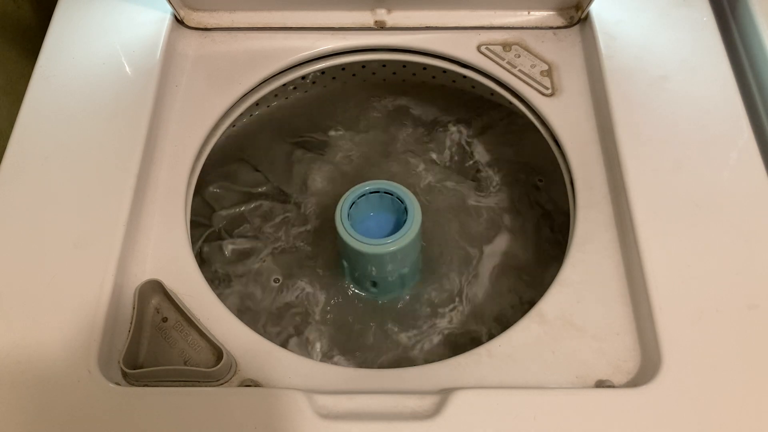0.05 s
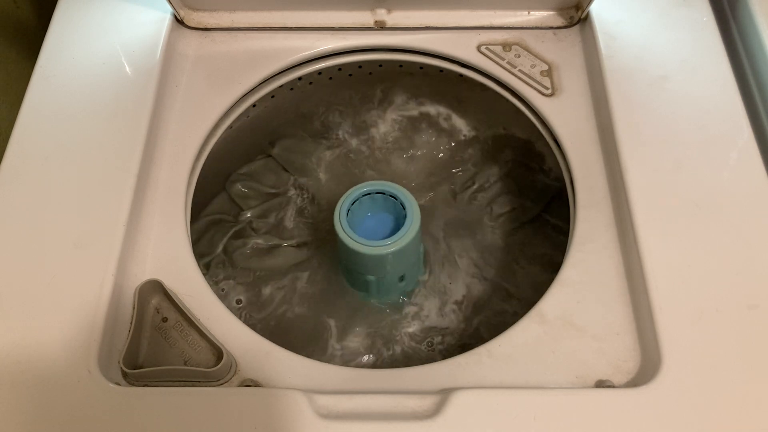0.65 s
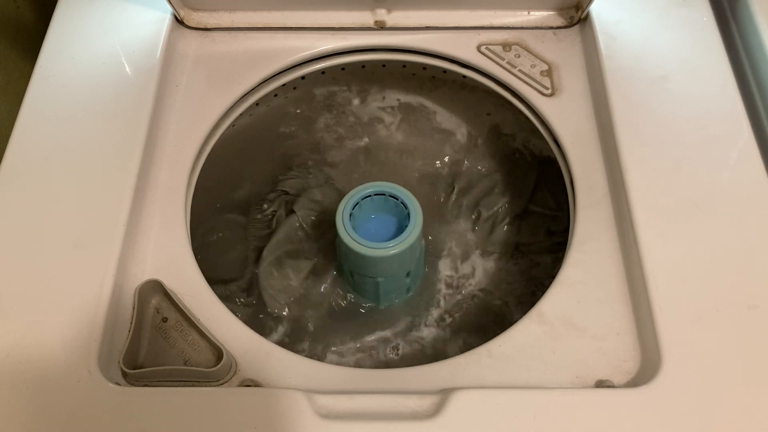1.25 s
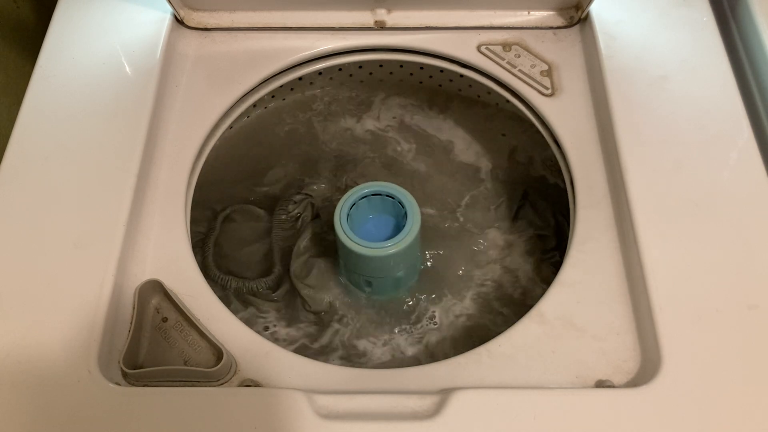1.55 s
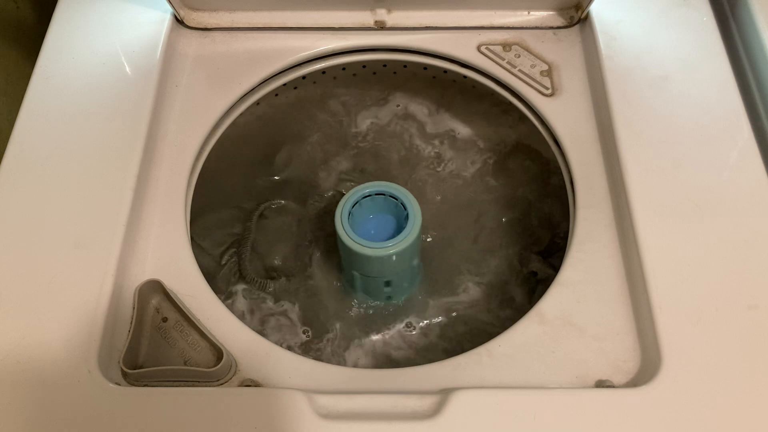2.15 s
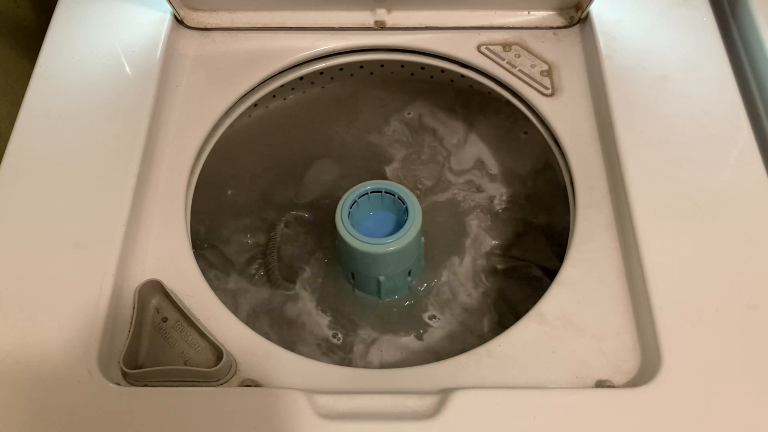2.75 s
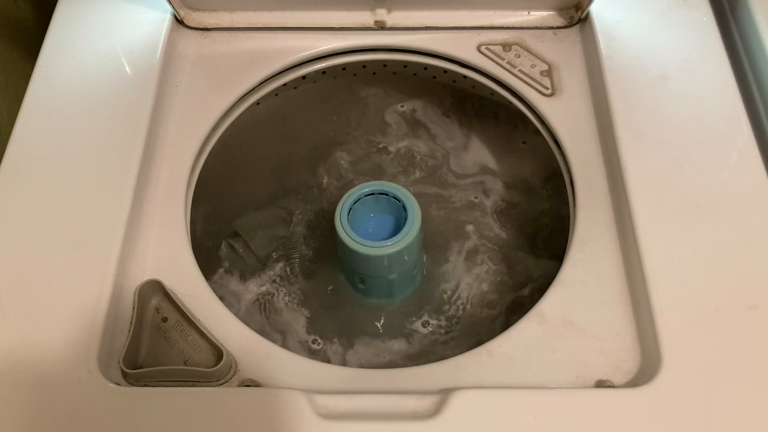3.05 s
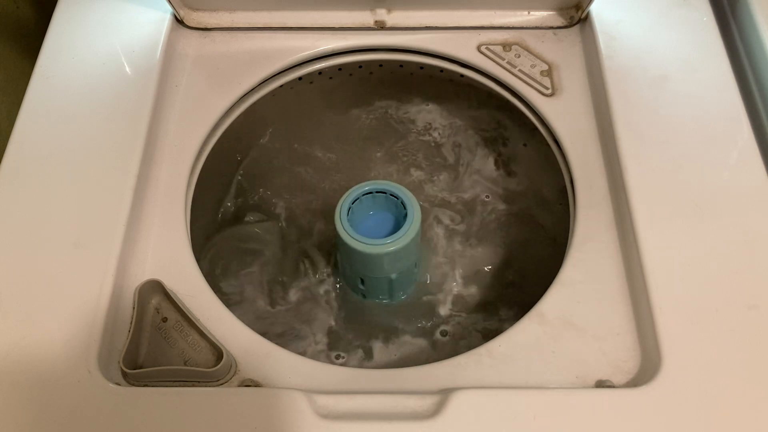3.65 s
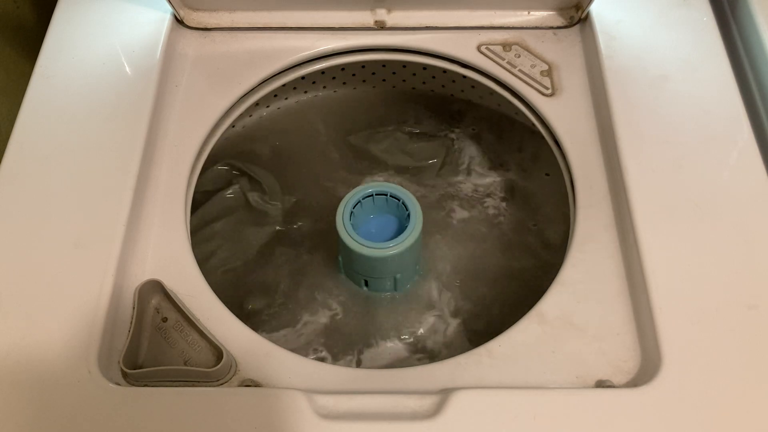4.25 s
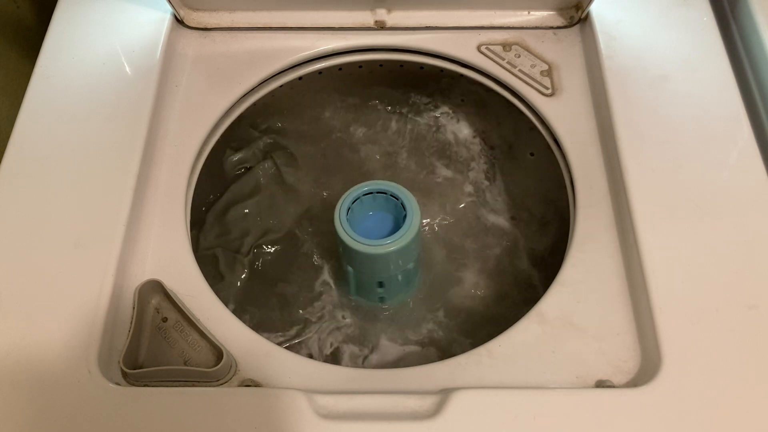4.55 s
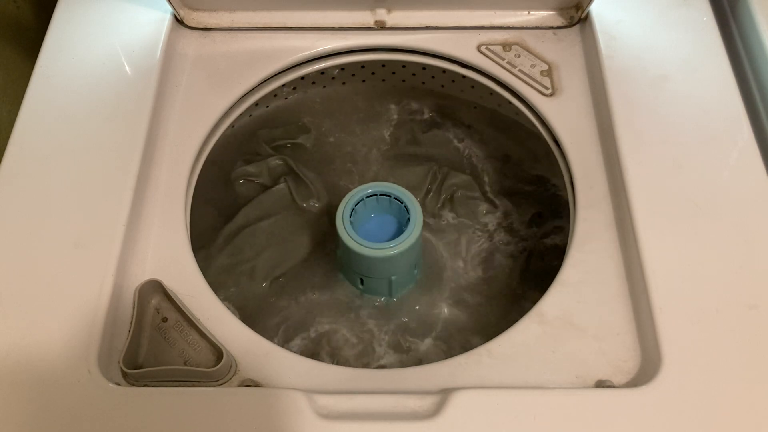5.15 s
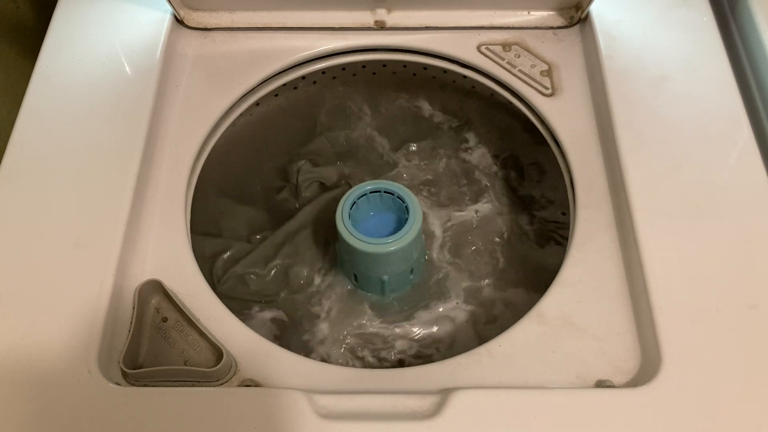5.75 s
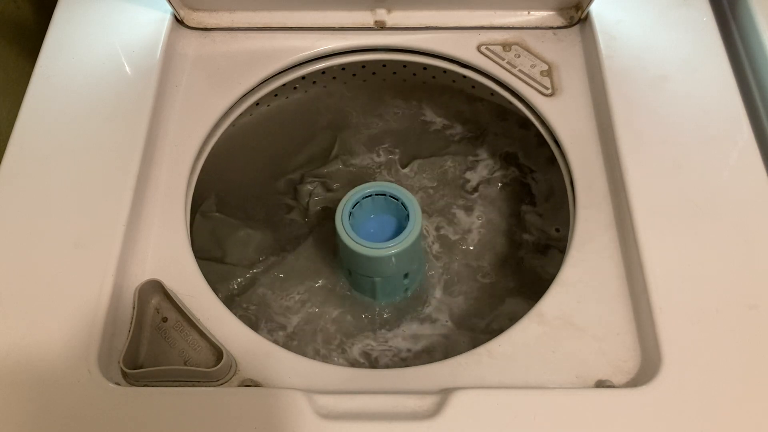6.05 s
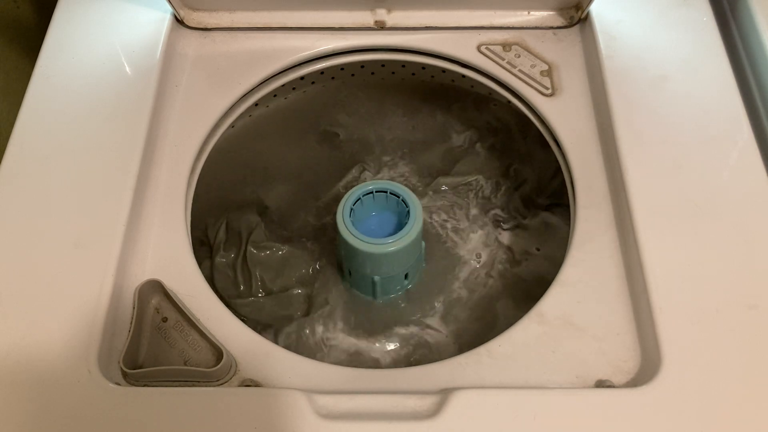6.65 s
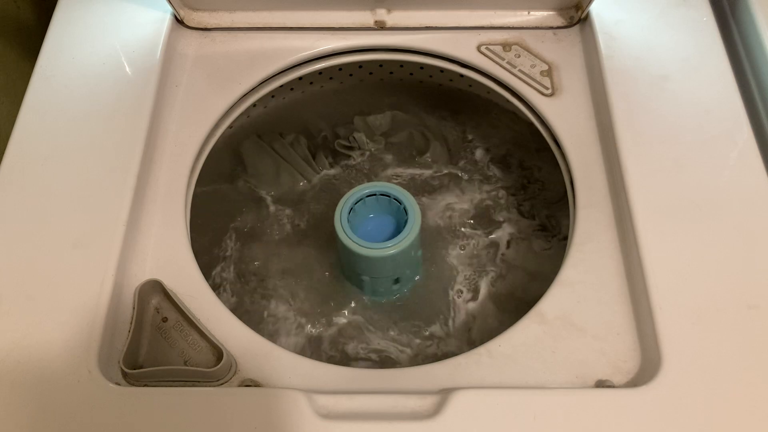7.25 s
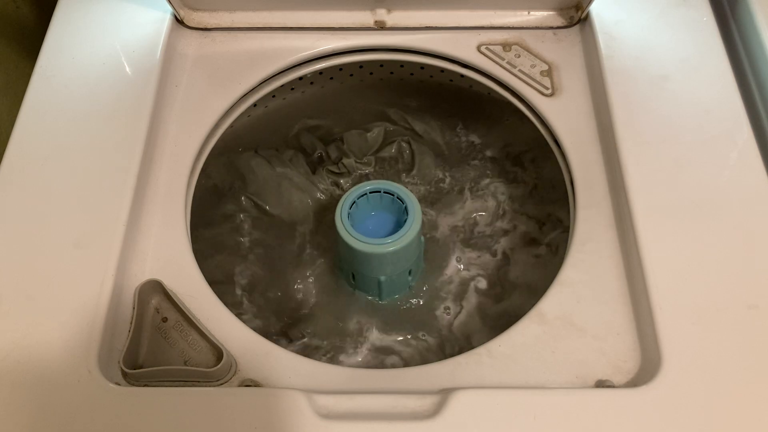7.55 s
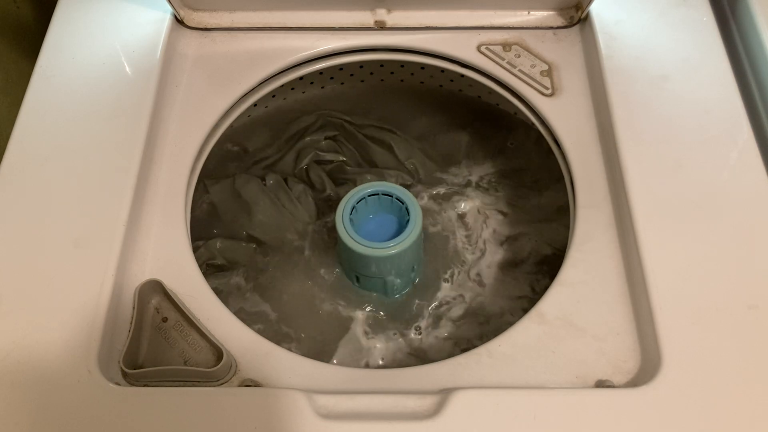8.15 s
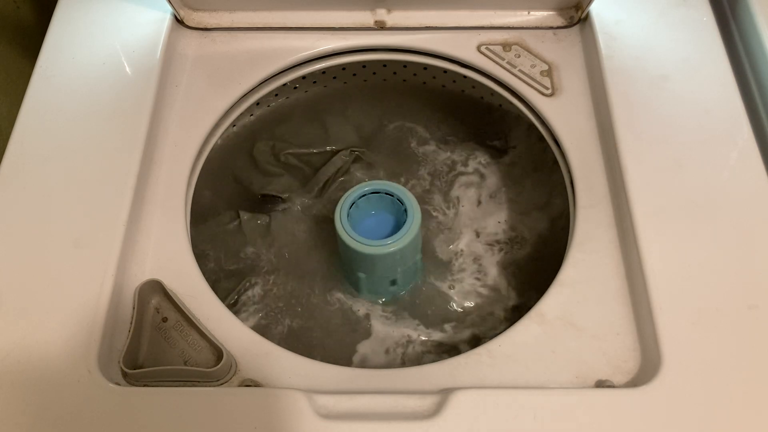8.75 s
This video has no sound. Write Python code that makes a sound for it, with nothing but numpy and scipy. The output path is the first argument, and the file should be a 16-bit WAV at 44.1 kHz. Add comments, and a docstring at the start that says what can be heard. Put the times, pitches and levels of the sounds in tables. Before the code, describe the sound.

A top-load washing machine runs indoors for about nine seconds, heard from just above the open tub. From the start the motor gives a low, throbbing hum and a fine high hiss, the steel cabinet rumbles, a bearing whines thinly and suds lap. About twice a second the agitator drags wet laundry through the water with a short swish, some strokes strong and others barely there. Low glugs begin at about 0.3 seconds and recur now and then until around 7 seconds. From 2 seconds, brief clusters of small bubbles gurgle at irregular moments. Wet cloth slaps the water at about 3.4, 5.8, 6.7, 7.7 and 8.2 seconds, with the hardest strokes at 5.8 and 7.7. A gear tone swells briefly near 4.35 seconds. The hum and the swishing rhythm carry on to the end.

```python
"""A top-load washing machine agitates a full tub with its lid open, heard from just above.
From the start the motor hums and hisses, the drive shakes the steel cabinet, a bearing sings and
suds lap. About twice a second the agitator drags wet laundry through the water with a short swish.
Low glugs soon sound in the water; from 2 s clusters of small bubbles gurgle, and from 3.4 s cloth
slaps the water on some of the harder strokes. At 4.35 s a gear tone swells briefly."""
import sys
import numpy as np
from scipy import signal
from scipy.fft import rfft, irfft, next_fast_len
from scipy.io import wavfile
from scipy.ndimage import map_coordinates

SR = 44100
rng = np.random.default_rng(int(sys.argv[2]) if len(sys.argv) > 2 else 0)


def generate_wav(sig):
    """Save sig (samples, or channels by samples) to the path in sys.argv[1] as 16-bit PCM at SR."""
    pcm = np.round(np.clip(np.atleast_2d(sig).T, -1, 1) * 32767).astype(np.int16)
    wavfile.write(sys.argv[1], SR, pcm)


N = 392931

# agitator strokes: (time [s], relative swish level [dB], relative wake level [dB])
STROKES = [(0.03, -54, -54), (0.505, -40, -41), (0.958, -39, -39), (1.45, -50, -50), (1.936, -39, -40.5),
           (2.441, -40.5, -40), (2.88, -41.5, -45.5), (3.405, -39, -43), (3.831, -45, -50),
           (4.358, -39.5, -41.5), (4.83, -52.5, -52), (5.315, -42, -45), (5.772, -34.5, -37),
           (6.274, -39.5, -39), (6.736, -40, -40.5), (7.246, -39.5, -39.5), (7.704, -35.5, -39),
           (8.216, -40, -40), (8.72, -49.5, -48)]


def amp(db):
    """Decibels to amplitude ratio."""
    return 10 ** (np.asarray(db) / 20)


def unit(x):
    """Scale to rms 1."""
    return x / np.sqrt(np.mean(x ** 2) + 1e-20)


def clock():
    """The time of every sample in seconds."""
    return np.arange(N) / SR


def along(points, hz):
    """Interpolate (frequency, value) points on a logarithmic axis."""
    freqs, values = np.transpose(points)
    return np.interp(np.log(hz + 1), np.log(freqs + 1), values)


def curves(rows):
    """One value per sample for each column after the time."""
    times, *columns = np.transpose(rows)
    return [np.interp(clock(), times, column) for column in columns]


def bumps(rows, width_s):
    """A Gaussian pulse for each (time, height) row."""
    t = clock()
    return sum(height * np.exp(-np.minimum(((t - s) / width_s) ** 2, 20)) for s, height in rows)


def wobble(rate):
    """Smooth random modulation, rate knots a second."""
    coarse = np.linspace(0, N / SR, 2048)
    knots = rng.standard_normal(int(N * rate / SR) + 4)
    return np.interp(clock(), coarse, map_coordinates(knots, [coarse * rate]))


def swing(count, lag):
    """Periodic load: count peaks a stroke, one lag seconds after it. Torque peaks twice, out and back."""
    times = np.array(STROKES)[:, 0]
    period, first = np.polyfit(np.arange(len(times)), times, 1)
    return np.cos(2 * np.pi * count * (clock() - first - lag) / period)


def shaft():
    """Rotation: one cycle per motor turn, a little under half the mains rate."""
    shaft_hz = 29
    return np.sin(2 * np.pi * shaft_hz * clock())


def surge(events, delay, rise, hold, fade):
    """Flow envelope: at each (time, level) event it builds, holds and decays exponentially."""
    flow, t = np.zeros(N), clock()
    for s, db in events:
        near = slice(*np.searchsorted(t, [s - .5, s + 1]))
        age = t[near] - s - delay
        attack = np.clip(1 + age / rise, 0, 1) ** 2
        flow[near] += amp(db) * attack * np.exp(-np.maximum(age - hold, 0) / fade)
    return flow


def filtered(x, response):
    """Linear filtering: the spectrum of x times a frequency response."""
    size = next_fast_len(N + SR // 4)
    return irfft(rfft(x, size) * response(np.fft.rfftfreq(size, 1 / SR)), size)[..., :N]


def white():
    """Two uncorrelated noises of 0 dB per Hz."""
    return rng.standard_normal((2, N)) * np.sqrt(SR / 2)


def peaks(rows, hz):
    """Resonance: a bell-shaped lift in dB for each (frequency, width, lift) row."""
    return sum(db * np.exp(-np.minimum(((hz - centre) / width) ** 2, 20)) for centre, width, db in rows)


def ripple(hz, centre_hz=2000, depth_db=2.5):
    """Standing waves leave fine peaks and dips, in dB, over a wide range round the centre."""
    spacing_hz = 22
    knots = rng.standard_normal((2, SR // spacing_hz))
    reach = 2 * hz * centre_hz / (hz ** 2 + centre_hz ** 2)
    return depth_db * reach * np.array([np.interp(hz / spacing_hz, np.arange(len(k)), k) for k in knots])


def spread(pair, colour):
    """Partial coherence: two unrelated signals, coloured in dB, blend as mid and side into stereo."""
    # left-right likeness: (frequency [Hz], correlation before clipping [1])
    likeness = [(60, 0.86), (130, 0.92), (290, 0.85), (400, 0.7), (640, 0.22), (1300, 0.019), (5500, -0.21),
                (7500, 1), (9300, -2.36), (10300, 0.51), (11200, 1), (11600, 1), (12100, 0.49),
                (12800, -0.68), (13400, -1.9), (15000, -0.43)]

    def response(hz):
        angle = np.arccos(np.clip(along(likeness, hz), -.85, .98)) / 2
        return amp(colour(hz)) * np.array([np.cos(angle), np.sin(angle)])
    mid, side = filtered(pair, response)
    return np.array([mid + side, mid - side])


def hum(low_db, bend, bend_lag, snap, snap_lag, waver, flutter, skew, swell_s):
    """Magnetic forces vibrate the motor's iron at 2 and 4 times the mains rate; load modulates the hum."""
    # hum as the wash shifts: (time [s], base level at 120 Hz [dB], base level at 240 Hz [dB])
    levels = [(0.0, -31, -38), (0.8, -37.5, -39.5), (1.35, -36.5, -36.5), (2.15, -32.5, -38),
              (2.8, -35.5, -41), (4.3, -38, -37), (4.9, -44, -41), (5.3, -36, -42.5), (5.8, -34, -38),
              (7.6, -36.5, -37), (8.2, -38.5, -44.5), (8.91, -38, -32.5)]
    # throbs under load: (count [per stroke], lag [s], depth at 120 Hz [dB], depth at 240 Hz [dB])
    throbs = [(1, -0.15, 2.5, 1), (2, 0.032, 2.5, 2), (2, -0.053, 0, 4.5)]
    # brief swells and dips of the low tone: (time [s], lift [dB])
    swells = [(0.13, -19), (1.97, 4.5), (1.57, -10), (2.08, -14), (2.55, -7), (3.96, -10), (7.74, 7.5),
              (8.66, 8)]
    mains_hz = 60
    low, high = curves(levels)
    for count, lag, low_depth_db, high_depth_db in throbs:
        load = swing(count, lag)
        low, high = low + low_depth_db * load, high + high_depth_db * load
    phase = 2 * np.pi * 2 * mains_hz * clock()
    # each stroke bends the low tone's phase, and it snaps back
    strain = bend * swing(count=1, lag=bend_lag) + snap * swing(count=2, lag=snap_lag)
    first = amp(low + low_db + bumps(swells, swell_s)) * np.sin(phase + strain + waver * wobble(7.6))
    second = amp(high) * np.sin(2 * phase + waver * wobble(9) + skew * np.array([[1], [-1]]))
    return np.sqrt(2) * (first + second) * (1 + flutter * shaft())


def gears(sway_db, waver, rough, apart):
    """Periodic forces in shaft and gears give weak tones, modulated by each stroke and jittered in phase."""
    # motor and gear tones, and the 240 Hz hum's shaft sidebands at 208.6 and 270 Hz: (frequency [Hz], level
    # [dB], swell as the stroke gathers [dB])
    tones = [(58.1, -57, 2), (208.6, -47.5, 2), (270, -47.5, -5), (390, -45, 3), (487.6, -50, 2),
             (642.5, -53, -1.5), (1114, -59.5, 7)]
    out, load = np.zeros((2, N)), swing(count=1, lag=-0.03)
    for hz, db, swell_db in tones:
        phase = 2 * np.pi * hz * clock() + waver * wobble(10) + rough * hz / 1000 * wobble(45)
        offset = apart * hz / 1000 * np.array([[1], [-1]])  # high tones reach the two sides out of step
        out += amp(db) * unit(amp(swell_db * load + sway_db * wobble(8)) * np.sin(phase + offset))
    return out


def rumble(level_db, shake_db, pulse_db, lurch_s, drift_db):
    """Forced vibration: the transmission shakes resonant panels, harder with each turn, swing and lurch."""
    # drive noise: (frequency [Hz], relative density [dB per Hz])
    spectrum = [(20, -98), (36, -95), (47, -82), (57, -61.5), (100, -57.5), (155, -61), (200, -59.5),
                (300, -57.5), (390, -60), (500, -68.5), (700, -78), (1200, -86), (3000, -120)]
    # modes of cabinet and tub: (frequency [Hz], width [Hz], lift [dB])
    modes = [(126.2, 6.8, 6.5), (141.3, 4.8, 8.5), (163.7, 3.3, 7.5), (179, 4, 2.5), (211.2, 9.6, 8.5),
             (246, 21, 4), (267.5, 4.8, 4), (289.1, 3, 7), (330.6, 8.6, 4), (355, 6.3, 5),
             (376.2, 7.3, 6.5), (424.6, 5.5, 7.5), (460.8, 17, 7), (487.5, 7.6, 5), (511.3, 5.3, 9),
             (565, 21.5, 8.5), (606.6, 12.7, 12.5), (635.7, 7, 11), (684, 22, 9)]
    # the wet load lurches against the tub: (time [s], lift [dB])
    lurches = [(1.97, 4.5), (2.47, 3), (2.92, 3.5), (4.34, 1), (5.43, 2), (5.82, 2), (6.31, 3), (7.44, 3),
               (7.735, 1.5), (8.15, 2), (8.66, 3)]
    shake = shake_db * shaft() + pulse_db * swing(count=2, lag=-0.039) + bumps(lurches, lurch_s)
    panels = spread(white(), lambda hz: along(spectrum, hz) + peaks(modes, hz))
    return amp(level_db + shake + drift_db * wobble(12)) * panels


def bearing(level_db, pitch_hz, width_hz, wander_hz, shake_hz, pulse_db, drift_db):
    """Friction excites a bearing's resonance, which wanders, shakes each turn and swells with torque."""
    # strength of the whine: (time [s], relative level [dB])
    levels = [(0, -56.5), (2.9, -57), (3.85, -61), (4.2, -55), (4.45, -57), (5.3, -56.5), (5.46, -53),
              (5.6, -53), (5.72, -60), (6.2, -56), (7.6, -58), (8.25, -56), (8.91, -57.5)]
    band = filtered(rng.standard_normal(N), lambda hz: 1 / (1 + (hz / width_hz) ** 2))
    pitch = pitch_hz + wander_hz * wobble(14) + shake_hz * shaft()
    rub_db = curves(levels)[0] + pulse_db * swing(count=2, lag=.06) + drift_db * wobble(6.7)
    carrier = np.exp(2j * np.pi * np.cumsum(pitch) / SR)  # shifts the noise band up to the pitch
    return amp(level_db + rub_db) * unit(np.real(signal.hilbert(band) * carrier))


def hiss(level_db, pulse_db, drift_db, buzz, fizz_db, fizz_gain):
    """The motor's ringing sizzle is amplitude-modulated at odd mains harmonics; torque brightens it."""
    # motor hiss: (frequency [Hz], relative density [dB per Hz])
    spectrum = [(6000, -120), (9500, -102), (9700, -81), (10100, -89.5), (10500, -84.5), (10950, -88),
                (11160, -85.5), (11480, -86.5), (11650, -95), (12100, -93), (13000, -97), (13800, -99),
                (15500, -112)]
    # its resonances: (frequency [Hz], width [Hz], lift [dB])
    rings = [(10020, 14, 6), (10202, 12, 4), (10460, 16, 3), (10512, 20, 4), (10700, 25, 3), (11122, 16, 4),
             (11162, 16, 9.5), (11352, 20, 4.5), (11525, 15, 9), (12030, 45, 4)]
    # its bright edge: (frequency [Hz], relative density [dB per Hz])
    edge = [(9000, -120), (11800, -92.5), (12800, -95.5), (13600, -102), (15500, -108)]
    chop = sum(np.cos(2 * np.pi * hz * clock()) for hz in (60, 180, 420))
    flutter = .55 * wobble(30)
    swell = pulse_db * swing(count=2, lag=-0.022) + drift_db * wobble(6.0) + flutter
    colour = lambda hz: along(spectrum, hz) + peaks(rings, hz) + ripple(hz, centre_hz=11000, depth_db=1.5)
    sizzle = amp(level_db + swell) * spread(white(), colour)
    fizz = amp(fizz_db + fizz_gain * swell) * spread(white(), lambda hz: along(edge, hz))
    return (1 + buzz * chop) * (sizzle + fizz)


def whir(level_db, drift_db):
    """Drive and churning water radiate broadband noise, in which narrow resonances sound as thin whines."""
    # drive and water noise: (frequency [Hz], relative density [dB per Hz])
    spectrum = [(200, -100), (500, -81), (800, -71.5), (1120, -75.5), (1300, -78.5), (2250, -80),
                (2550, -83), (3450, -85.5), (3780, -84), (4450, -86.5), (5000, -91.5), (7000, -95),
                (9500, -102), (16000, -110)]
    # whines of belt and bearings, and a tub mode near 1.7 kHz: (frequency [Hz], width [Hz], lift [dB])
    whines = [(972, 6.3, 7), (1118, 13, 4), (1156, 12, 3.5), (1300, 17, 5), (1480, 17, 1), (1683, 26, 4.5),
              (2800, 37, 0)]
    gain = amp(level_db + drift_db * wobble(8.9))
    return gain * spread(white(), lambda hz: along(spectrum, hz) + peaks(whines, hz) + ripple(hz))


def bubbles(flow, count, pitch_hz, octaves, cycles, scatter_db):
    """Each bubble is a damped oscillator of rising pitch, born most often where the flow is strong."""
    draws = rng.standard_normal((count, 2))
    start = np.searchsorted(np.cumsum(flow) / flow.sum(), rng.random(count))
    hz = np.clip(pitch_hz * 2 ** (octaves * draws[:, :1]), 500, 9000)
    age = np.arange(SR // 60)
    turns = hz * age / SR
    strength = amp(scatter_db * np.clip(draws[:, 1:], -2, 2))
    rings = strength * np.exp(-turns / cycles) * np.sin(2 * np.pi * turns * (1 + 0.023 * turns / cycles))
    return np.bincount((start[:, None] + age).ravel(), rings.ravel(), N)[:N]


def tub(x, t60):
    """Reverberation: the open steel tub gives each side its own short decaying tail; rms 1."""
    age = np.arange(SR // 8) / SR
    tails = rng.standard_normal((2, len(age))) * amp(-60 * age / t60)
    tails[:, 0] = np.linalg.norm(tails, axis=1)  # the direct sound is as strong as the tail
    return unit(signal.fftconvolve(x[None], tails, axes=1)[:, :N])


def lapping(level_db, clump_db, gather_db):
    """Bubble resonance in the suds: they pop in small clumps, busiest as the next stroke gathers."""
    stir = amp(clump_db * wobble(8) + gather_db * swing(count=1, lag=-.035))
    suds = bubbles(stir, count=1600, pitch_hz=1760, octaves=0.456, cycles=5.5, scatter_db=2.5)
    return amp(level_db) * tub(suds, t60=0.15)


def swishes(spray_db, froth_db, drain_db, grit_db):
    """Turbulence: cloth and water drag past the vanes, making ragged spray, froth, then larger bubbles."""
    # spray noise: (frequency [Hz], relative level [dB])
    spectrum = [(200, -18), (700, 3), (1200, -10), (1650, 4), (2400, 1), (3300, 0), (3800, -5),
                (4400, -6.5), (5500, -18.5), (9000, -17), (15000, -38)]
    flow = surge([(s, db) for s, db, _ in STROKES], delay=0, rise=.018, hold=.032, fade=.032)
    wake = surge([(s, db) for s, _, db in STROKES], delay=.04, rise=.04, hold=.03, fade=.06)
    spurts = amp(grit_db * wobble(110))
    noise = spread(rng.standard_normal((2, N)), lambda hz: along(spectrum, hz) + ripple(hz))
    spray = flow * unit(spurts * noise)
    small = bubbles(flow ** 2, count=1600, pitch_hz=2397, octaves=0.38, cycles=4.4, scatter_db=6.5)
    froth = amp(froth_db) * tub(small, t60=0.038)
    large = bubbles(wake ** 2, count=1000, pitch_hz=1703, octaves=0.16, cycles=7.5, scatter_db=4)
    drain = amp(drain_db) * tub(large, t60=0.12)
    return amp(spray_db) * spray + flow.std() * (froth + drain)


def low_tones(level_db, rise_s, fade_s, climb_per_s, rough):
    """Damped oscillations of slightly rising pitch: glugs in the water and one swell of a gear tone."""
    # glugs, and at 4.35 s the 489 Hz gear tone's swell: (time [s], pitch [Hz], relative level [dB])
    events = [(.325, 431, -37), (.62, 289, -35.5), (.765, 278, -32.5), (1.485, 151, -34), (1.775, 352, -34),
              (1.895, 355, -33), (2.545, 300, -33), (3.615, 290, -33), (4.345, 489, -38.5),
              (5.821, 151, -31.5), (5.865, 149, -38), (6.765, 194, -35)]
    out, t = np.zeros(N), clock()
    unrest = rough * wobble(60)
    for s, hz, db in events:
        near = slice(*np.searchsorted(t, [s - .1, s + .2]))
        age = t[near] - s
        swell = np.clip(1 + age / rise_s, 0, 1) * np.exp(-np.maximum(age, 0) / fade_s)
        phase = 2 * np.pi * hz * age * (1 + climb_per_s * age / 2)
        out[near] += amp(db) * swell * np.sin(phase + unrest[near])
    return amp(level_db) * np.sqrt(2) * out


def gurgles(octaves, cycles, t60):
    """Size sets a bubble's resonance: trapped air escapes in clusters of like size, near one pitch."""
    # bubble clusters: (time [s], pitch [Hz], half length [s], level [dB])
    clusters = [(2.03, 2010, .012, -46), (2.586, 1015, 0.014, -41), (3.808, 1830, .025, -50),
                (3.834, 900, .035, -46), (4.294, 1100, 0.024, -50), (4.756, 880, .012, -42),
                (7.366, 2770, .003, -40), (7.833, 1980, 0.0089, -46)]
    out = np.zeros(N)
    for s, hz, half_length, db in clusters:
        escape = bumps([(s, 1)], half_length)
        cluster = bubbles(escape, count=12, pitch_hz=hz, octaves=octaves, cycles=cycles, scatter_db=6)
        out += amp(db) * escape.std() * unit(cluster)
    return out.std() * tub(out, t60)


def slaps(pitch_hz, fade_s):
    """Impact: a fold of cloth smacks the surface and sets off a short, crisp crackle of bubbles."""
    # wet cloth hits the water: (time [s], level [dB])
    impacts = [(3.412, -47), (5.782, -40.5), (6.738, -44.5), (7.708, -43.5), (8.214, -47.5)]
    smack = surge(impacts, delay=0, rise=0.00404, hold=0.0088, fade=fade_s)
    contact = smack > smack.max() / 20
    crackle = bubbles(contact, count=500, pitch_hz=pitch_hz, octaves=0.34, cycles=4.6, scatter_db=7.0)
    return smack.std() * tub(smack * crackle, t60=0.033)


def scene():
    """Superposition of drive and water; the left microphone faces the tub a little more."""
    # level difference between the sides: (frequency [Hz], left minus right [dB])
    balance = [(100, 0.2), (300, 1), (1000, 1.5), (2200, 3), (4500, 0)]
    drive = hum(low_db=-1.5, bend=0.49, bend_lag=0.027, snap=0.31, snap_lag=0.084,
                waver=0.23, flutter=0.15, skew=0.17, swell_s=0.039)
    drive += gears(sway_db=3.5, rough=0.74, waver=0.92, apart=0.39)
    drive += rumble(level_db=-0.42, shake_db=0.86, pulse_db=.5, lurch_s=0.024, drift_db=0.4)
    drive += bearing(level_db=-5.5, pitch_hz=3732, width_hz=62, wander_hz=36, shake_hz=36,
                     pulse_db=0.5, drift_db=0.4)
    drive += hiss(level_db=-2.5, pulse_db=0.26, drift_db=0.58, buzz=0.042, fizz_db=-0.5, fizz_gain=3.4)
    wash = whir(level_db=-0.18, drift_db=1.0)
    wash += lapping(level_db=-58.5, clump_db=5.5, gather_db=2)
    wash += swishes(spray_db=-4.5, froth_db=-9.5, drain_db=-8.5, grit_db=2)
    wash += low_tones(level_db=4, rise_s=0.031, fade_s=.035, climb_per_s=0.64, rough=0.34)
    wash += gurgles(octaves=0.091, cycles=7.2, t60=0.05)
    wash += slaps(pitch_hz=2380, fade_s=.008)
    return filtered(drive + wash, lambda hz: amp(along(balance, hz) * np.array([[.5], [-.5]])))


def record(dry):
    """Band limiting: an ideal low-pass filter removes the highest treble."""
    top_hz = 15700
    return filtered(dry, lambda hz: hz < top_hz)


dry = scene()
out = record(dry)
generate_wav(out)
```